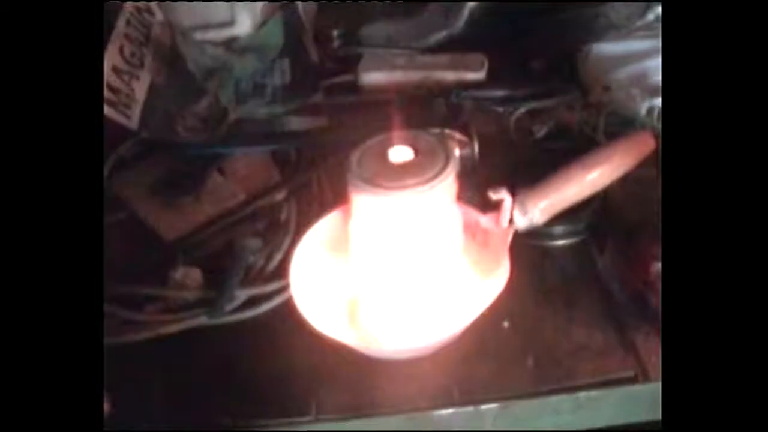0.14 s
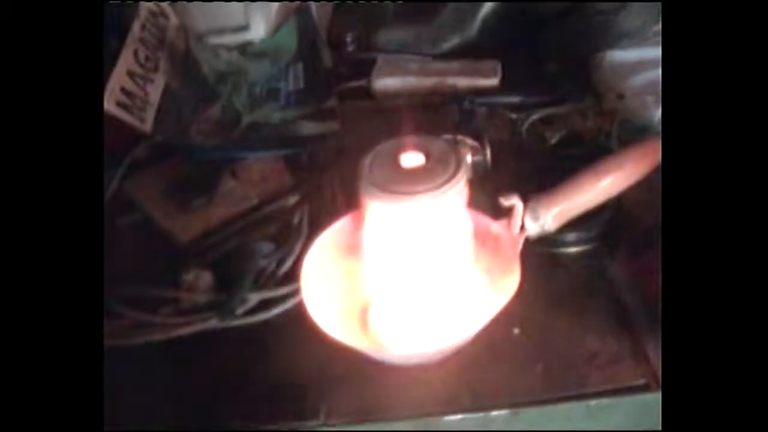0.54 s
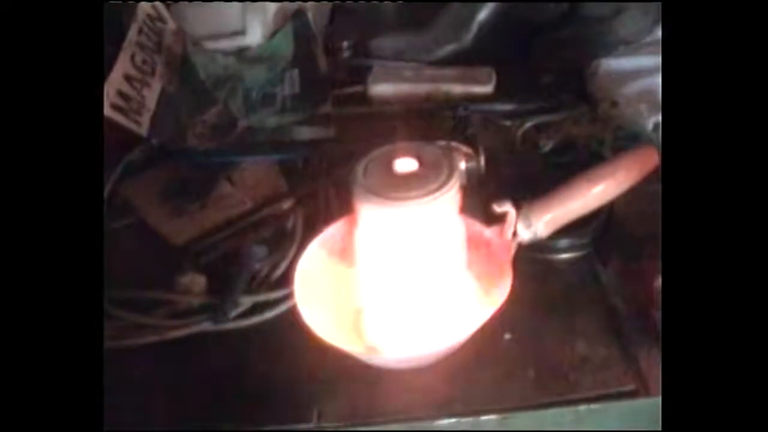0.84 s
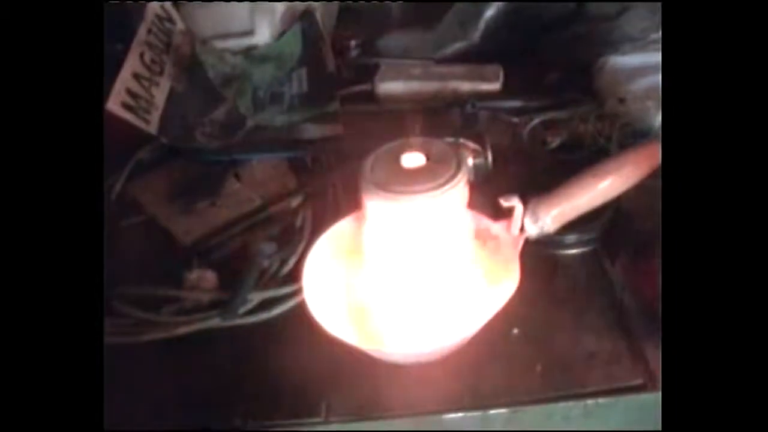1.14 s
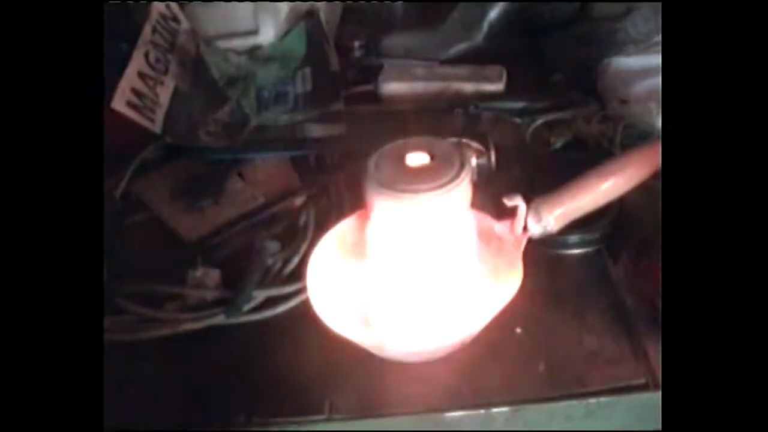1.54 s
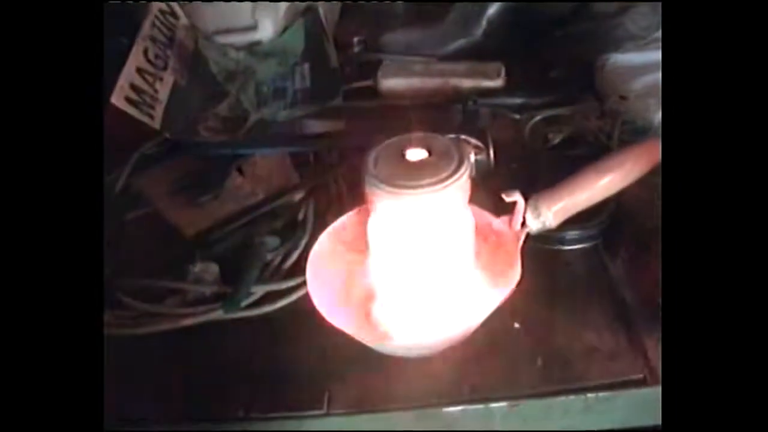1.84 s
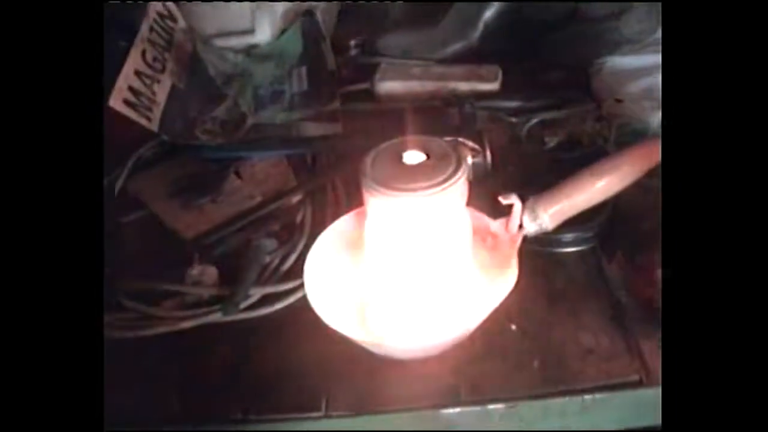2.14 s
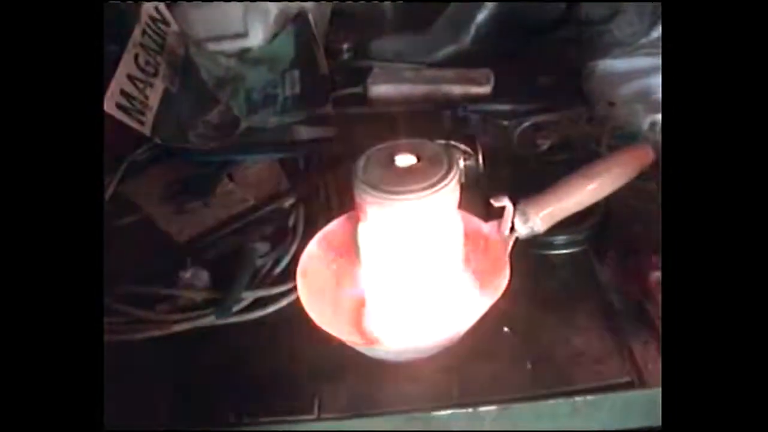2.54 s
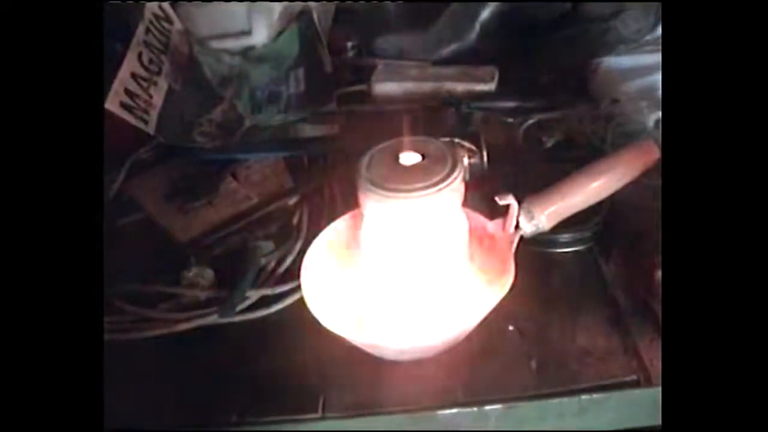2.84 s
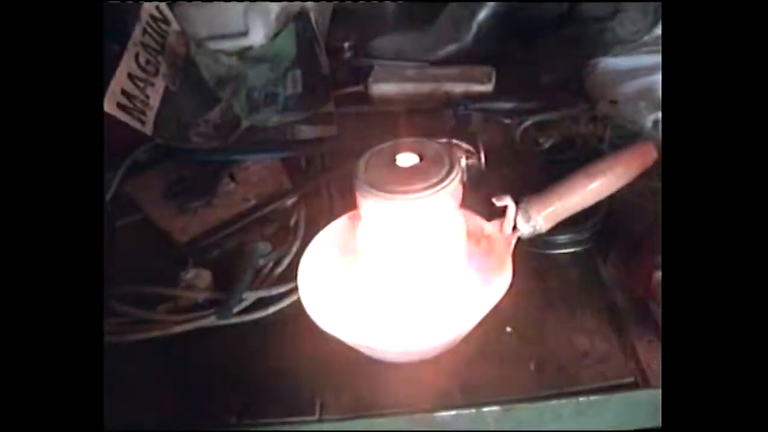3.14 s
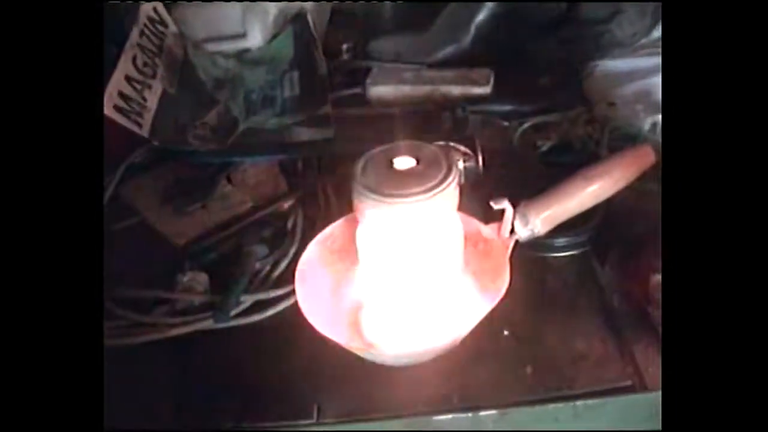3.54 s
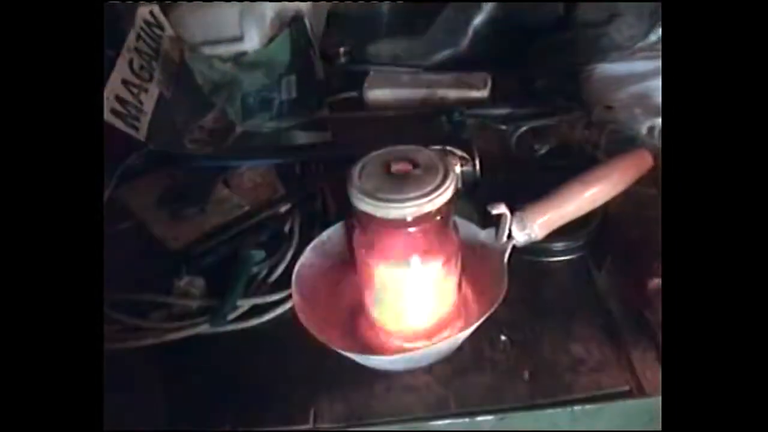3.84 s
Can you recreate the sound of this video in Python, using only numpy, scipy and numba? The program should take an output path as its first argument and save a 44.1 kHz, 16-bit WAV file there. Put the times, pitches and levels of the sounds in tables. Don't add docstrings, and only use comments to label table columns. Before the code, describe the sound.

A jar pulse jet buzzes in a rough, fluttering roar, then sputters out in a small workshop.

```python
import sys
import numpy as np
from scipy import signal
from scipy.fft import rfft, irfft, next_fast_len
from scipy.io import wavfile
from scipy.ndimage import uniform_filter1d
from numba import njit

SR = 44100
rng = np.random.default_rng(int(sys.argv[2]) if len(sys.argv) > 2 else 0)


def gain_from_db(level_db):
    decades = np.asarray(level_db, float) / 20
    return 10 ** decades


def int16_out(signal):
    q = np.round(np.clip(np.atleast_2d(signal).T, -1, 1) * 32767)
    wavfile.write(sys.argv[1], SR, q.astype(np.int16))


N = 176400


def shade(x, table):
    hz, db = np.array(table, float).T
    size = next_fast_len(N + SR // 4)
    f = np.arange(size // 2 + 1) * SR / size + 1
    gain = gain_from_db(np.interp(np.log(f), np.log(hz), db))
    return irfft(rfft(x, size) * gain, size)[:N]


def noise(table):
    x = shade(rng.standard_normal(N), table)
    return x / x.std()


def lay(times, shape):
    at = np.round(times * SR).astype(int)[:, None] + np.arange(-500, 2500)
    ok = (at >= 0) & (at < N)
    return np.bincount(at[ok], shape(at / SR - times[:, None])[ok], N)


def swell(s, rise_s, fall_s):
    return np.exp(-np.abs(s) / np.where(s < 0, rise_s, fall_s))


def resonance(x, hz, width_hz):
    return signal.lfilter(*signal.iirpeak(hz, hz / width_hz, SR), x)


# pitch_hz, level_db (per Hz)
SHOP_COLOUR = [(24, -37.5), (40, -2), (79, -4.5), (124, -16), (222, -15.5), (654, -37), (4530, -41.5),
               (6390, -40), (14000, -55.5)]
SHOP_DB = -63.5


def shop():
    return gain_from_db(SHOP_DB) * noise(SHOP_COLOUR)


WHINE_HZ, WHINE_DB = 15622, -86


def whine():
    return gain_from_db(WHINE_DB) * np.sqrt(2) * np.sin(2 * np.pi * WHINE_HZ * np.arange(N) / SR)


# start_s (first jet), firings (count), level_db
RUNS = [(0.021, 3, -22.5), (0.097, 20, -24), (0.523, 6, -26), (0.65, 9, -23.5), (0.816, 13, -25),
        (1.08, 6, -24.5), (1.195, 9, -26.5), (1.382, 4, -23), (1.454, 1, -28), (1.487, 2, -33),
        (1.547, 9, -25.5), (1.742, 4, -22.5), (1.814, 11, -27.5), (2.04, 14, -23), (2.31, 6, -25),
        (2.412, 1, -21.5), (2.44, 3, -25.5), (2.487, 2, -28.5), (2.533, 4, -33), (2.623, 11, -25.5),
        (2.83, 6, -26), (2.958, 2, -32), (2.994, 4, -28), (3.089, 9, -25.5), (3.267, 5, -22.5),
        (3.348, 3, -26.5), (3.423, 9, -28), (3.616, 4, -26.5), (3.69, 3, -20.5), (3.74, 1, -30)]
# start_s, level_db (against their run)
ODD_FIRINGS = [(0.2, 1.5), (0.286, 0), (0.31, -5), (0.355, 2), (0.434, -2), (0.569, 3), (0.781, 2),
               (0.798, 2.5), (0.836, -9), (1.26, -5), (1.281, 0.5), (1.32, -2.5), (1.436, 2), (1.593, -3.5),
               (1.633, -2.5), (1.794, 2.5), (1.836, -1), (1.878, -4), (2.156, -4.5), (2.211, -3.5),
               (2.253, -1), (2.361, 1), (2.378, -7), (2.58, 2), (2.771, -1.5), (2.892, -4), (2.917, 2.5),
               (2.939, 5.5), (3.489, 2), (3.53, 2)]
# start_s, level_db, jet_db, lid_ring_db
LAST_POPS = [
    (3.775, -36.5, -6, -47),
    (3.819, -39, -5, -64),
    (3.863, -37.5, -23, -55),
]
POPS = len(LAST_POPS)
JITTER_S, SCATTER_DB = 0.000737, 1.1


def firings():
    start, count, db = np.array(RUNS).T
    first = np.r_[0, np.cumsum(count)[:-1]]
    k = np.arange(-1, first[-1] + 1)
    chance = rng.standard_normal((len(k), 2))
    times = np.interp(k, first, start) + JITTER_S * chance[:, 0]
    times[0] = 2 * times[1] - times[2]
    db = np.interp(k, first, db) + SCATTER_DB * chance[:, 1]
    for s, odd_db in ODD_FIRINGS:
        near = np.argmin(np.abs(times - s))
        times[near] = s
        db[near] += odd_db - SCATTER_DB * chance[near, 1]
    pops = np.array(LAST_POPS)
    return np.r_[times, pops[:, 0]], np.r_[db, pops[:, 1]]


# delay_s, level_db
ECHOES = [
    (.0051, -7.5),
    (.0082, -8),
]
BLAST_DB, BLAST_LEAD_S, BLAST_RISE_S, BLAST_DECAY_S = 5.5, .0033, .0007, .004
BLAST_HZ, BLAST_SPREAD, CREST_SCATTER_DB = 150, 0.19, 2.26
SUCK_DB, SUCK_S, SUCK_LAW = 3.5, 0.00085, 0.55


def blasts(times, db):
    hz = BLAST_HZ * np.exp(BLAST_SPREAD * rng.standard_normal((len(times), 1)))
    crest = gain_from_db(BLAST_DB + CREST_SCATTER_DB * rng.standard_normal((len(times), 1)))
    depth = gain_from_db(SUCK_DB + SUCK_LAW * (db - np.median(db)))[:, None]

    def shape(s):
        u = s + BLAST_LEAD_S * BLAST_HZ / hz
        rise = np.exp(np.minimum(u, 0) / BLAST_RISE_S)
        ring = np.cos(2 * np.pi * hz * u) * np.exp(-np.abs(u) / BLAST_DECAY_S)
        suck = depth * np.exp(-(s / SUCK_S) ** 2 / 2)
        return gain_from_db(db)[:, None] * (crest * np.where(u < 0, rise, ring) - suck)

    direct = lay(times, shape)
    out = direct
    for delay_s, echo_db in ECHOES:
        out = out + gain_from_db(echo_db) * np.r_[np.zeros(int(delay_s * SR)), direct][:N]
    return out


BREATH_DB, BREATH_LAG, BREATH_DB_PER_HZ = -12, 0.78, -0.5


def breath(times, db):
    t, times, db = np.arange(N) / SR, times[:-POPS], db[:-POPS]
    cycle = np.interp(t, times, np.arange(len(times)))
    rate_hz = 1 / np.gradient(times)
    db = uniform_filter1d(db + BREATH_DB_PER_HZ * (rate_hz - 50), size=3)
    size = gain_from_db(np.interp(t, np.r_[times, times[-1] + .03], np.r_[db, -90]) + BREATH_DB)
    return size * np.sqrt(2) * np.cos(2 * np.pi * (cycle - BREATH_LAG))


# pitch_hz, level_db (per Hz)
JET_COLOUR = [(290, -18), (500, -2), (1490, -4), (1990, -1.5), (3900, -4.5), (6550, -15), (9240, -11),
              (11800, -15.5), (15500, -24)]
JET_DB, JET_LAW, JET_SCATTER_DB = -6.5, 1.62, 1.87
JET_RISE_S, JET_FALL_S, WAKE_DB, WAKE_S = .0011, 0.0016, -6.5, 0.0097
JET_ECHO_S, JET_ECHO_DB = .0052, -11


def jet(times, db):
    mean_db = np.mean(db)
    burn_db = mean_db + JET_LAW * (db[:-POPS] - mean_db)
    pops_db = db[-POPS:] + np.array(LAST_POPS)[:, 2]
    db = np.r_[burn_db, pops_db] + JET_DB
    slow = np.r_[np.ones(len(db) - POPS), np.full(POPS, 2.5)][:, None]

    def shape(s):
        after = np.maximum(s, 0)
        rise = np.exp(-(np.minimum(s, 0) / JET_RISE_S / slow) ** 2 / 2)
        burst = np.exp(-after / JET_FALL_S / slow)
        wake = gain_from_db(WAKE_DB) * np.exp(-after / WAKE_S)
        echo = gain_from_db(JET_ECHO_DB) * np.exp(-((s - JET_ECHO_S) / 0.0012) ** 2)
        return size * rise * (burst + wake + echo)

    out = 0
    for lo, hi in [(1, 900), (900, 1600), (1600, 2800), (2800, 4500), (4500, 7000), (7000, SR)]:
        band = [(lo / 1.2, -30), (lo, -1), (hi, -1), (hi * 1.2, -30)]
        size = gain_from_db(db + JET_SCATTER_DB * rng.standard_normal(len(db)))[:, None]
        hiss = np.array([shade(noise(JET_COLOUR), band) for _ in range(2)])
        out = out + lay(times, shape) * hiss
    return out


# pitch_hz, level_db, t60_s
LID_MODES = [(2245, 0, .11), (3300, -9, .09), (4100, -2, .04), (2450, -4, .03)]
LID_DB = -34


def lid(times, db):
    db = np.r_[db[:-POPS] + LID_DB, np.array(LAST_POPS)[:, 3]]
    out = 0
    for hz, mode_db, t60 in LID_MODES:
        size = gain_from_db(db + mode_db + 2.8 * rng.standard_normal(len(db)))[:, None]

        def shape(s):
            fade = np.clip(s * 770.0, 0, 1) * np.exp(-np.abs(s) * np.log(1000) / t60)
            return size * fade * np.sin(2 * np.pi * hz * s)

        out = out + lay(times, shape)
    return out


# pitch_hz, level_db (per Hz)
ROAR_COLOUR = [(35, -31.5), (60, 8.5), (76, -26), (119, -15.5), (221, 4.5), (354, -14), (450, 3.5),
               (500, -3), (650, -39.5), (1100, -120)]
ROAR_DB, ROAR_DECAY_S = -6, 0.0081


def roar(times, db):
    size = gain_from_db(db + ROAR_DB)[:, None]
    return noise(ROAR_COLOUR) * lay(times, lambda s: size * swell(s, .003, ROAR_DECAY_S))


# pitch_hz, level_db (per Hz)
FLAME_COLOUR = [(450, -11.5), (600, 0), (1500, -5), (4000, -6.5), (9000, -20.5), (14000, -25.5)]
FLAME_DB, FLAME_S = -20, .022


def flame(times, db):
    size = gain_from_db(db[:-POPS] + FLAME_DB)[:, None]
    return noise(FLAME_COLOUR) * lay(times[:-POPS], lambda s: size * swell(s, FLAME_S / 10, FLAME_S))


PUFF_DB, PUFF_SCATTER_DB, PUFF_WAIT_S = 2.5, 3.2, 0.00903
PUFF_HZ, PUFF_SPREAD, PUFF_CYCLES = 248.4, 0.26, .3


def puffs(times, db):
    out = 0
    for _ in range(2):
        chance = rng.standard_normal((len(times), 2))
        hz = PUFF_HZ * np.exp(PUFF_SPREAD * chance[:, :1])
        size = gain_from_db(db[:, None] + PUFF_DB + PUFF_SCATTER_DB * chance[:, 1:])
        late = times + 0.0023 + PUFF_WAIT_S * rng.random(len(times))

        def shape(s):
            return size * np.cos(2 * np.pi * hz * s) * np.exp(-(s * hz / PUFF_CYCLES) ** 2 / 2)

        out = out + lay(late, shape)
    return out


JAR_LOW_HZ, JAR_TOP_HZ, JAR_STEP_DB = 38, 464, -20
STEADY_DB_PER_HZ = -0.0943


def jar(times, db):
    steady_db = STEADY_DB_PER_HZ * np.clip(1 / np.gradient(times) - 50, -10, 15)
    late_db = db - steady_db
    body = blasts(times, db + steady_db) + puffs(times, late_db) + roar(times, late_db)
    body = shade(body, [(JAR_TOP_HZ, 0), (JAR_TOP_HZ * 1.105, JAR_STEP_DB)])
    low_cut = [(JAR_LOW_HZ / 2, -32), (JAR_LOW_HZ, -6), (JAR_LOW_HZ * 1.4, 0)]
    return shade(body + breath(times, db), low_cut)


# pitch_hz, width_hz, share_removed (0-1)
HOLLOWS = [(2840, 444, 0.61), (4530, 280, 0.67), (355.5, 15.4, 0.53), (90.6, 23, 0.32), (1580, 290, 0.32)]


def bench(x):
    for hz, width_hz, share in HOLLOWS:
        x = x - share * resonance(x, hz, width_hz)
    return x


@njit
def walls(x, lags, gain, damp):
    line, soft, out = np.zeros((8, 4096)), np.zeros(8), np.zeros((2, len(x)))
    for i in range(len(x)):
        total = 0.
        for k in range(8):
            soft[k] += (1 - damp) * (gain[k] * line[k, (i - lags[k]) & 4095] - soft[k])
            total += soft[k]
            out[k % 2, i] += soft[k]
        for k in range(8):
            line[k, i & 4095] = x[i] + soft[k] - total / 4
    return out


# pitch_hz, level_db, t60_s
ROOM_MODES = [(46.5, -11, 1), (57.8, -10, 1), (121.6, -8, 0.48), (176.3, -19.5, 0.46), (213.5, -7, 0.68)]
ROOM_DB, ROOM_T60_S, ROOM_DAMP = -16, 0.26, .3


def room(x):
    lags = np.array([487, 613, 751, 887, 1031, 1193, 1367, 1553])
    wet = gain_from_db(ROOM_DB) * walls(x + 1e-18, lags, gain_from_db(-60 * lags / SR / ROOM_T60_S), ROOM_DAMP)
    for hz, mode_db, t60 in ROOM_MODES:
        wet[0] += gain_from_db(mode_db) * resonance(x, hz, np.log(1000) / np.pi / t60)
    return wet


# pitch_hz, level_db
MIC_TOP = [(12500, 0), (14200, -11.5), (14900, -21)]
# pitch_hz, level_db
LEAN = [(60, 1.5), (110, 2), (200, 1.5), (380, 3), (700, 1.0), (1290, 0.5), (2380, 2.5), (4400, 1.5),
        (8120, 2), (15000, -2.5)]
# pitch_hz, level_db
PORTS = [(300, -33.5), (1000, -16.5), (2200, -28), (4400, -15), (8000, -7), (13000, -40.5)]


def microphone(centre, apart):
    mid = shade(centre, MIC_TOP) + shop()
    side = shade(shade(apart, MIC_TOP), PORTS)
    left = shade(mid, [(hz, db / 2) for hz, db in LEAN]) + side
    right = shade(mid, [(hz, -db / 2) for hz, db in LEAN]) - side
    return np.array([left, right]) + whine()


def scene():
    times, db = firings()
    hiss, apart = jet(times, db)
    dry = bench(jar(times, db) + hiss + flame(times, db) + lid(times, db))
    wet = room(dry)
    return microphone(dry + wet[0], apart + wet[1])


def band_limit(x):
    return signal.sosfilt(signal.butter(12, 15800, fs=SR, output="sos"), x)


def record(dry):
    return band_limit(dry)


dry = scene()
out = record(dry)
int16_out(out)
```